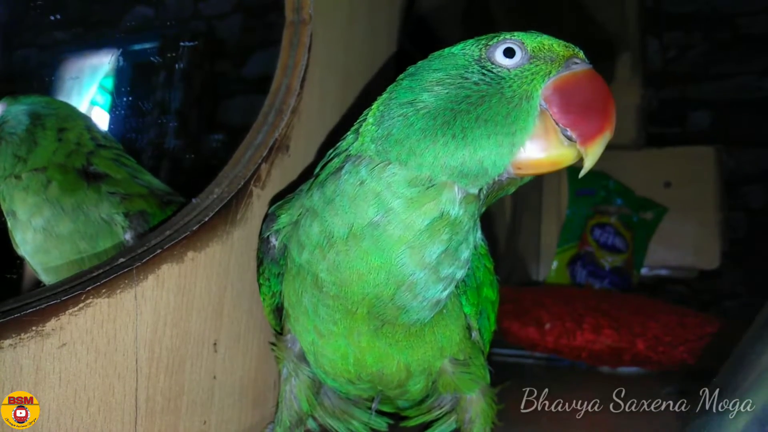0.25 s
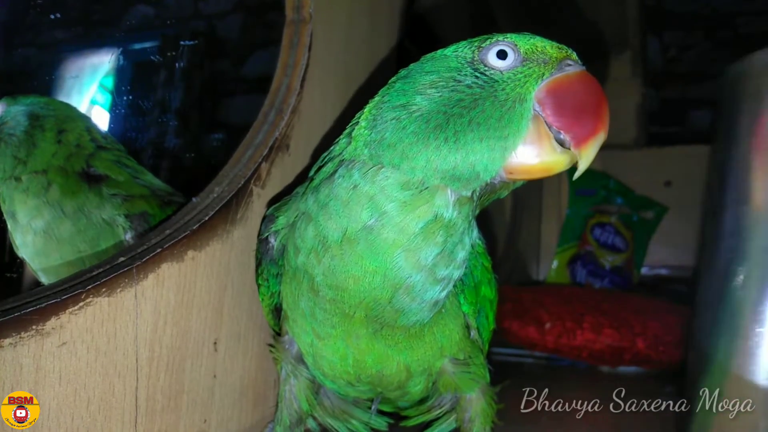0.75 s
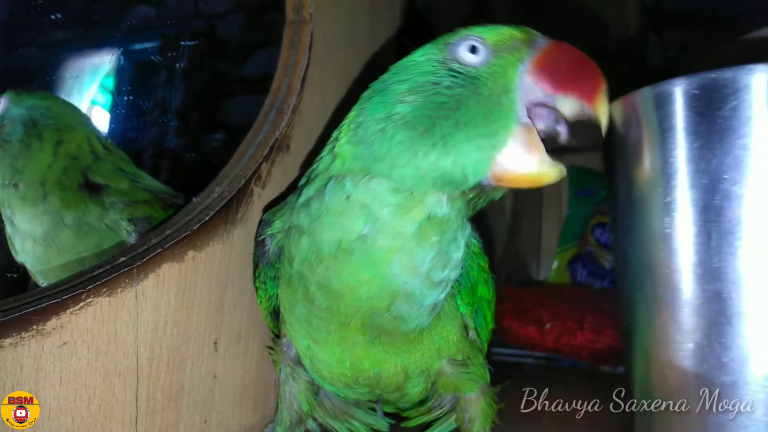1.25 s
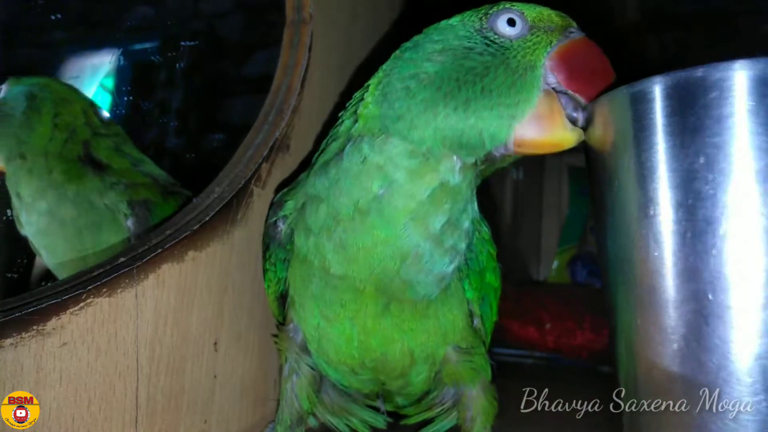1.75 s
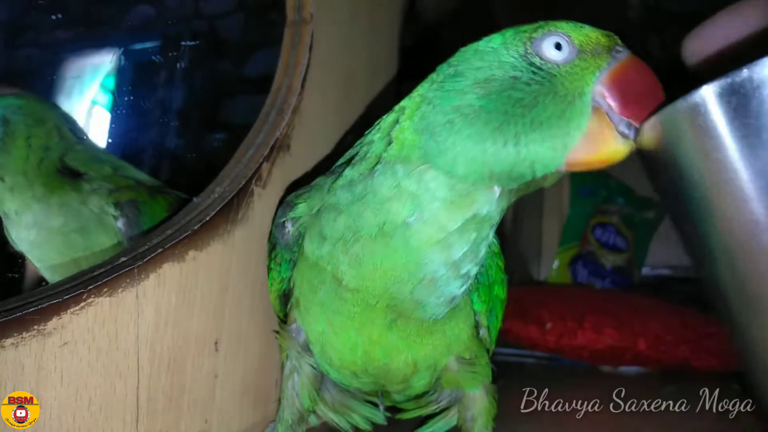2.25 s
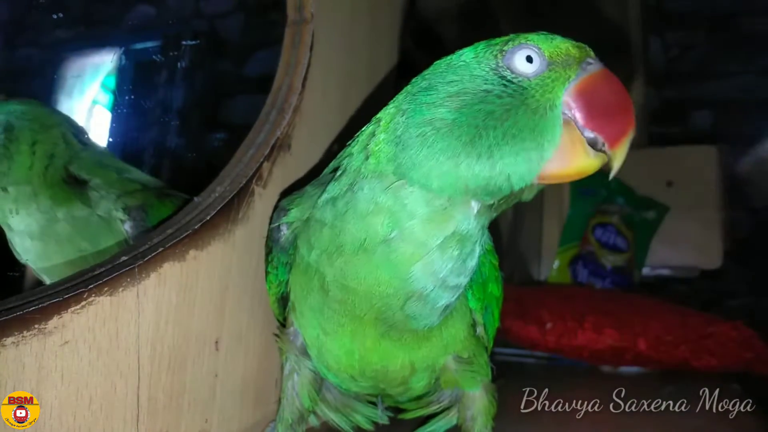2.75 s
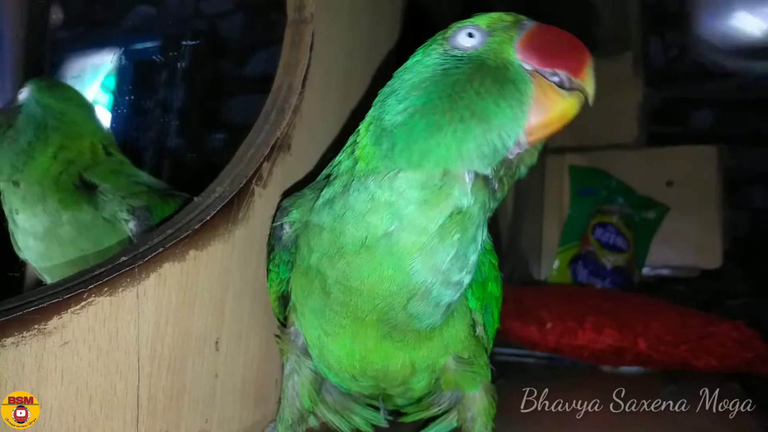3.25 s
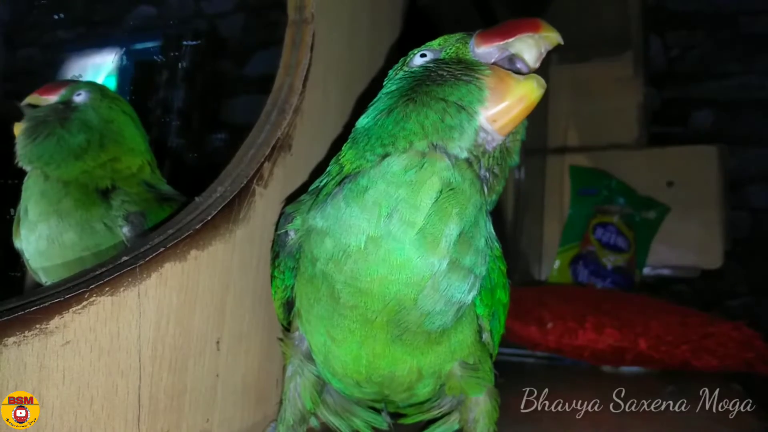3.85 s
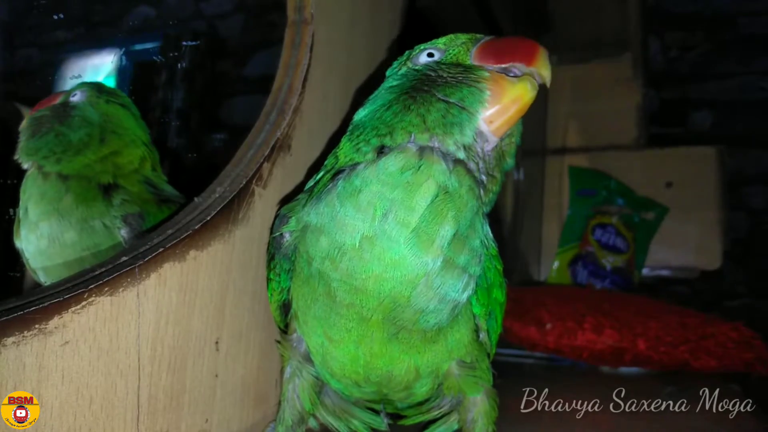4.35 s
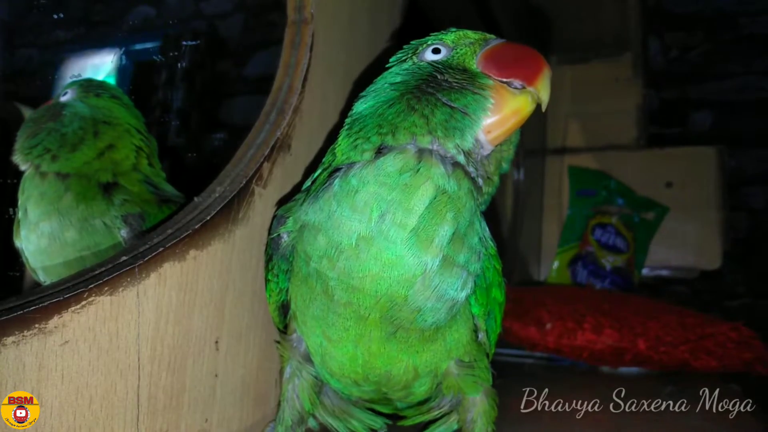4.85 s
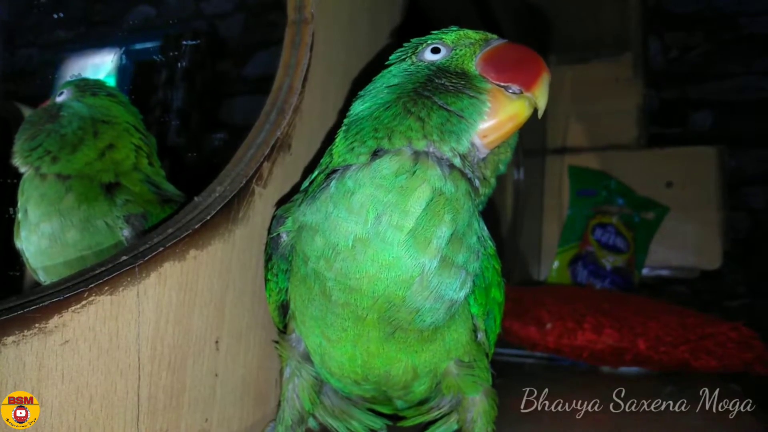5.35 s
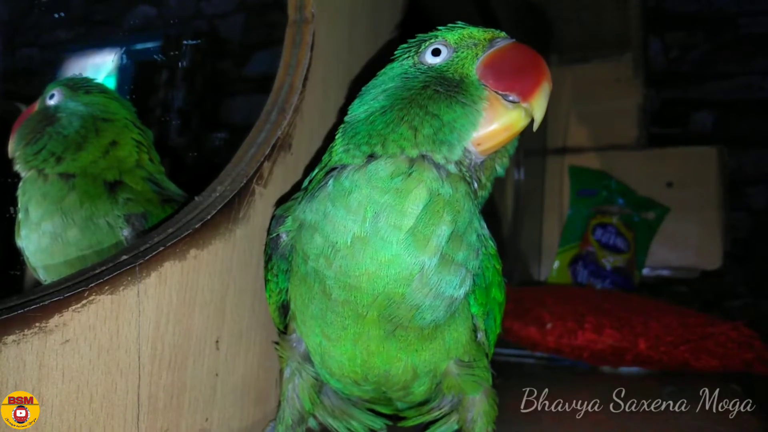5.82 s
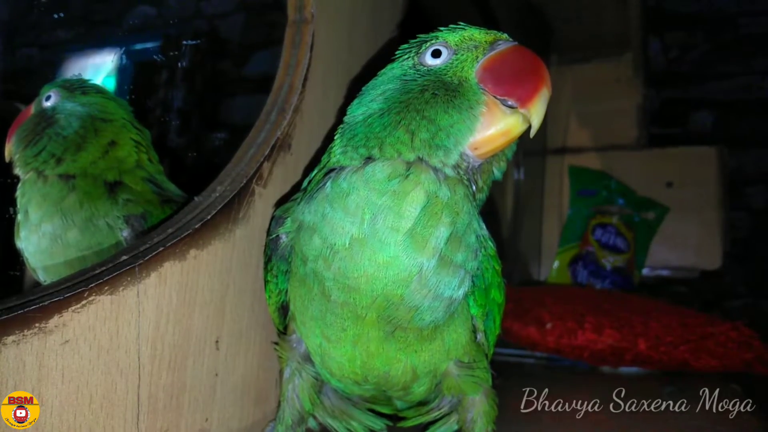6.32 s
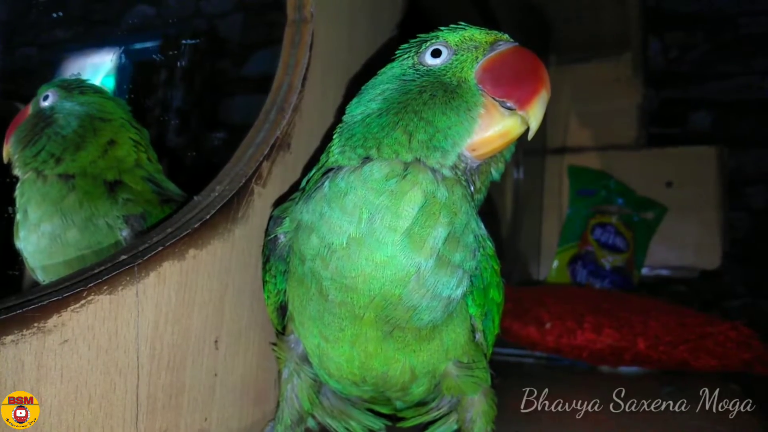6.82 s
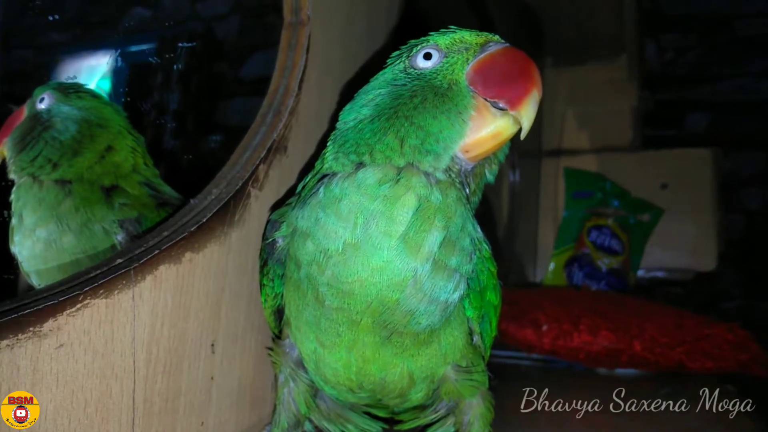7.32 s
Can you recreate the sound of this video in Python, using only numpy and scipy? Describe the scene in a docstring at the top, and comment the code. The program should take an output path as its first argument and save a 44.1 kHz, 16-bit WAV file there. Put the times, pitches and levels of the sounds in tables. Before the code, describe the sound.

Close recording of a parakeet in a small, hard-walled room. A fan rushes steadily and its draught thumps and rumbles unevenly against the microphone. The bird calls three times, once at about two seconds, then twice in quick succession after five, each shrill call starting abruptly, breaking into a harsh trill and leaving a short bright echo.

```python
"""Parakeet squawks in a small hard room

A parakeet close to the microphone squawks three times; the echo of an earlier squawk is dying at the start.
Pulses of its syrinx ring through the windpipe: a clear rising tone that cracks into a rough, trilling one.
Behind it a fan hisses as steady shaped noise, and its draught buffets the microphone with rumble and puffs.
Gain control eases the level down under the calls."""
import sys
import numpy as np
from scipy import signal
from scipy.fft import rfft, irfft, next_fast_len
from scipy.io import wavfile
from scipy.ndimage import uniform_filter1d, minimum_filter1d, map_coordinates

SR = 44100
rng = np.random.default_rng(int(sys.argv[2]) if len(sys.argv) > 2 else 0)


def waveform_to_disk(signal):
    """Save audio, clipped to [-1, 1], as 16-bit WAV at the path in sys.argv[1]."""
    frames = np.transpose(np.atleast_2d(signal))
    scaled = np.clip(frames, -1, 1) * 32767
    samples = np.round(scaled).astype(np.int16)
    wavfile.write(sys.argv[1], SR, samples)


N = 334278

# fan hiss, spectral shape: (frequency [Hz], relative density [dB per Hz])
FAN_SPECTRUM = [(90, -16), (150, -17.5), (198, -12), (240, -24.5), (290, -13.5), (325, -18.5), (370, -13.5),
                (650, -14.5), (805, -9), (945, -15), (1210, -12.5), (1450, -16.5), (2200, -20), (4600, -37),
                (8300, -50), (15500, -41)]
# draught strength: (time [s], rumble level [dB])
DRAUGHT_LEVEL = [(0.0, -53.5), (0.23, -52), (0.69, -57), (1.46, -57), (1.65, -48), (1.98, -52), (2.09, -56),
                 (2.83, -62.5), (3.08, -61), (3.21, -52), (3.46, -52), (3.76, -58), (4.08, -59),
                 (4.43, -48.5), (4.9, -50), (5.62, -62.5), (5.91, -54.5), (6.36, -61), (7.03, -49),
                 (7.16, -56), (7.35, -60), (7.58, -54)]
# buffeting, spectral shape: (frequency [Hz], relative density [dB per Hz])
RUMBLE_SPECTRUM = [(12, -25), (20, 1.5), (45, -1), (93, -6.5), (151, -20), (200, -16), (260, -44),
                   (440, -120)]
# strong puffs on the microphone: (time [s], nominal peak [dB], width [s], direction [1 push, -1 pull])
STRONG_PUFFS = [(0.649, -36, 0.0076, 1), (1.047, -36.5, 0.0072, 1), (1.529, -30.5, 0.0033, 1),
                (1.623, -33, 0.0056, 1), (1.816, -35, 0.0023, -1), (3.203, -33.5, 0.0049, -1),
                (4.329, -36, 0.006, 1), (4.656, -38.5, 0.004, 1), (4.997, -34, 0.0055, 1),
                (5.118, -34, 0.0052, 1), (5.405, -34, 0.0048, 1), (6.49, -36, 0.004, 1),
                (6.862, -34, 0.0049, -1), (6.89, -34, 0.0073, -1), (6.915, -35, 0.0029, 1),
                (7.134, -34.5, 0.0032, -1)]
# decay of the room's tail: (frequency [Hz], time to fall 60 dB [s])
ROOM_DECAY = [(500, 0.17), (1500, 0.63), (3500, 0.51), (7000, 0.41), (14000, 0.04)]
# first echoes off the walls: (delay [s], level against the direct sound [dB])
WALL_ECHOES = [(.007, -11), (0.015, -9.5), (.024, -14), (.05, -12), (.093, -20)]
# gesture of each squawk: (beak opens [s], voice cracks [s], beak opening while clear [0-1],
# beak opening while rasping [0-1], roughness added at the crack [0-1], its fading [s], trill strongest [s],
# trill length [s], trill rate [Hz], pitch swing [share of pitch], level swing [dB])
GESTURES = [(-.285, -.21, 1, .65, .55, .3, -.2, .05, 28, .07, 0),
            (2.133, 2.218, .8, .55, .5, .13, 2.257, .04, 30, .16, 2),
            (5.121, 5.2, .75, .75, .35, .05, 5.286, .08, 27, .1, 1),
            (6.05, 6.092, .25, .38, .42, .22, 6.175, .06, 30, .03, 4)]
# voice of each squawk, one list per call: (time [s], pitch before trill and jitter [Hz], relative level [dB])
VOICE_CURVES = [
    [(-.3, 908, -60), (-.28, 934, -22), (-.2, 1400, -28), (-.09, 1394, -32), (-.04, 1400, -55)],
    [(2.112, 770, -58), (2.118, 790, -29), (2.123, 805, -35), (2.128, 840, -15), (2.137, 930, -23),
     (2.18, 951, -14.5), (2.216, 990, -19), (2.221, 1290, -21), (2.236, 1186, -17.5), (2.25, 1448, -21.5),
     (2.3, 1471, -23), (2.4, 1423, -32), (2.47, 1439, -42), (2.5, 1411, -62)],
    [(5.093, 781, -43), (5.103, 777, -17), (5.109, 785, -32), (5.116, 828, -15.5), (5.124, 915, -23),
     (5.14, 960, -16), (5.176, 1005, -17), (5.19, 1095, -16), (5.205, 1100, -19), (5.222, 1265, -13.5),
     (5.25, 1602, -20.5), (5.365, 1539, -24), (5.398, 1218, -23.5), (5.412, 1150, -60)],
    [(6.027, 556, -60), (6.032, 585, -31), (6.04, 620, -23), (6.061, 735, -27), (6.067, 764.5, -9),
     (6.088, 829, -19.5), (6.093, 834.5, -28), (6.099, 813, -19.5), (6.125, 748.4, -15.5),
     (6.145, 850, -19), (6.17, 815, -20), (6.215, 1075, -21.5), (6.26, 1020, -26), (6.295, 1010, -28),
     (6.35, 935, -29), (6.395, 800, -32), (6.405, 780, -60)],
]
# windpipe behind a wide-open beak: (frequency [Hz], gain [dB])
OPEN_THROAT = [(400, -37), (930, -12.5), (1250, -17), (1550, -9.5), (1950, -4.5), (2900, -1.5),
               (3800, -9.5), (4750, -28), (5500, -13), (6700, -14.5), (8600, -42.5), (9700, -28.5),
               (11900, -37.5), (12900, -33), (13700, -28)]
# windpipe behind a nearly shut beak: (frequency [Hz], gain [dB])
SHUT_THROAT = [(400, -29), (800, -15), (1600, -17), (2100, -4.5), (2450, 4.5), (2800, -10), (3300, -23.5),
               (4300, -13), (5200, -11.5), (6500, -27.5), (8600, -51.5), (14000, -38.5)]
# colour of the microphone capsule: (frequency [Hz], gain [dB])
CAPSULE = [(20, 2.5), (5000, 1), (6450, 8.5), (7400, 5.5), (13200, -5), (14500, -1), (15450, 0.5)]

FAN_DB = -48
# weaker puffs: lowest nominal peak [dB], random rise above it [dB], middle width [s], share that push
LIGHT_PUFF_DB, LIGHT_SPREAD_DB, LIGHT_WIDTH_S, PUSH_SHARE = -43, 4, .0055, .7
LEAD_S = .4  # sound made before the start, so the earlier squawk can echo into it
# opening at both ends of a call; how fast the beak moves; closing before the end
NARROW_BEAK, BEAK_MOVE_S, CLOSE_S = 0.32, 0.002, 0.033
# a hoarse start clears; the crack is sudden
START_ROUGH, START_FADE_S, CLEAR_ROUGH, CRACK_S = .3, .02, .08, .002
TOP_HZ = 15520  # band limit


def amp(db):
    """Turn dB into gain."""
    return 10 ** (np.asarray(db) / 20)


def unit(x):
    """Bring x to rms 1."""
    return x / np.sqrt(np.mean(x ** 2) + 1e-20)


def along(points, hz):
    """Read (frequency [Hz], value) points on a log frequency axis."""
    f, v = np.transpose(points)
    return np.interp(np.log(hz + 1), np.log(f + 1), v)


def wobble(size, rate):
    """Draw a smooth random curve with `rate` knots a second."""
    knots = rng.standard_normal(int(size * rate / SR) + 4)
    return map_coordinates(knots, [np.arange(size) * rate / SR])


def coloured(x, points):
    """Pass x through the causal, minimum-phase filter with (frequency [Hz], gain [dB]) points."""
    m = 2 * next_fast_len(len(x) // 2 + 4096)
    gain = amp(along(points, np.fft.rfftfreq(m, 1 / SR)))
    cepstrum = irfft(np.log(gain), m)
    # folding the cepstrum forward in time makes the filter causal
    cepstrum[1:m // 2] *= 2
    cepstrum[m // 2 + 1:] = 0
    response = np.exp(rfft(cepstrum))
    return irfft(rfft(x, m) * response, m)[:len(x)]


def fan():
    """A steady, slightly patchy rush of air: noise with small level patches in time and frequency."""
    z = signal.stft(rng.standard_normal(N + 512), nperseg=512)[2]
    patches = uniform_filter1d(rng.standard_normal(z.shape), size=5, axis=0)
    patches = uniform_filter1d(patches, size=12, axis=1)
    air = signal.istft(z * amp(1.0 * unit(patches)), nperseg=512)[1][:N]
    level = amp(FAN_DB + 0.057 * wobble(N, 2.34))
    return level * unit(coloured(air, FAN_SPECTRUM))


def light_puffs(strength, count):
    """Random rows like STRONG_PUFFS, likelier to fall where the draught is strong."""
    when, size, width, way = rng.random((count, 4)).T
    share = np.cumsum(strength) / np.sum(strength)
    times = np.interp(when, share, np.arange(N) / SR)
    peaks_db = LIGHT_PUFF_DB + LIGHT_SPREAD_DB * size
    return np.transpose([times, peaks_db, LIGHT_WIDTH_S * (.5 + width), PUSH_SHARE - way])


def draught():
    """Eddies push the membrane: a lumpy rumble and single puffs with an opposite dip on either side."""
    s, db = np.transpose(DRAUGHT_LEVEL)
    lumps = amp(1.9 * wobble(N, 22)) * coloured(rng.standard_normal(N), RUMBLE_SPECTRUM)
    t = np.arange(N) / SR
    strength = amp(np.interp(t, s, db))
    out = strength * unit(lumps)
    for peak, peak_db, width, way in [*STRONG_PUFFS, *light_puffs(strength, count=22)]:
        centre = round(peak * SR)
        near = slice(max(centre - 1500, 0), centre + 1500)
        u = (t[near] - peak) / max(width, .001)
        shape = 1.47 * np.exp(-2.2 * u * u) - 0.56 * np.exp(-.25 * u * u)
        out[near] += np.sign(way) * amp(peak_db) * shape
    return out


def room(x):
    """A few walls answer first, then a tail in which each frequency dies at its own speed."""
    hz, t, z = signal.stft(rng.standard_normal(SR), SR, nperseg=256)
    decay = amp(-60 * t / along(ROOM_DECAY, hz)[:, None])
    tail = signal.istft(z * decay, SR, nperseg=256)[1]
    tail *= np.clip(np.arange(len(tail)) / (0.032 * SR), 0, 1)  # builds up over 32 ms
    tail *= amp(-9) / np.linalg.norm(tail)
    tail[0] = 1  # direct sound
    for s, db in WALL_ECHOES:
        tail[round(s * SR)] += amp(db)
    return signal.fftconvolve(x, tail)


def gesture(t, row):
    """Roughness, beak opening and trill of one squawk, drawn from its few moments."""
    opens, cracks, clear_beak, rasp_beak, rasp, fade, top, length, trill_hz, swing, swing_db = row

    def step(s, width):
        """A smooth move from 0 to 1 around time s."""
        return .5 + .5 * np.tanh((t - s) / width)

    cracked = step(cracks, CRACK_S)
    rough = CLEAR_ROUGH + START_ROUGH * np.exp((t[0] - t) / START_FADE_S)
    rough += cracked * rasp * np.exp(-((t - cracks) / fade) ** 2)
    beak = NARROW_BEAK + (clear_beak - NARROW_BEAK) * step(opens, BEAK_MOVE_S)
    beak += (rasp_beak - clear_beak) * step(cracks, BEAK_MOVE_S)
    beak += (NARROW_BEAK - rasp_beak) * step(t[-1] - CLOSE_S, CLOSE_S / 2)
    trill_size = cracked * np.exp(-((t - top) / length) ** 2 / 2)
    trill = trill_size * np.cos(2 * np.pi * trill_hz * (t - top))
    return np.clip(rough, 0, .95), np.clip(beak, 0, 1), swing * trill, swing_db * trill


def squawk(rows, row):
    """The syrinx pulses at the pitch; roughness makes cycles uneven and lets breath through once a cycle."""
    s, *curves = np.transpose(rows)
    t = np.arange(s[0], s[-1], 1 / SR)
    pitch, db = [np.interp(t, s, curve) for curve in curves]
    rough, beak, trill, trill_db = gesture(t, row)
    db = db + trill_db
    jitter = rough * (.1 * wobble(len(t), 130) + .08 * wobble(len(t), 700))
    pitch = pitch * (1 + trill + jitter)
    phase = 2 * np.pi * np.cumsum(pitch) / SR
    k = np.arange(1, 28)[:, None]  # harmonic numbers
    harmonic_hz = k * pitch
    # less effort, softer pulses: overtones above 3.3 kHz fade as the level drops
    effort_db = uniform_filter1d(db, size=900)
    slack_db = np.clip(-19.0 - effort_db, 0, 25)
    soft = amp(-.45 * slack_db * np.clip((harmonic_hz - 3300) / 900, 0, 2.5))
    below_top = np.clip((16000 - harmonic_hz) / 500, 0, 1)
    pulses = np.sum(soft * np.cos(k * phase) * below_top, axis=0)
    pulses *= np.sqrt(pitch / SR * 4)  # evens out the power as pitch moves
    pulses *= amp(rough * 7 * wobble(len(t), 200))
    breath = rng.standard_normal(len(t)) * (1 + np.cos(phase)) * 0.77
    source = amp(db + 12.5) * (np.sqrt(1 - rough ** 2) * pulses + rough * breath)
    # a narrow beak leaves one sharp windpipe resonance; an open one lets the overtones out
    return coloured(beak * source, OPEN_THROAT) + coloured((1 - beak) * source, SHUT_THROAT)


def parakeet():
    """Each squawk sounds at its moment and rings in the room with its own echo."""
    out = np.zeros(N + 3 * SR)
    for rows, row in zip(VOICE_CURVES, GESTURES):
        call = room(squawk(rows, row))
        start = round((rows[0][0] + LEAD_S) * SR)
        out[start:][:len(call)] += call
    return out[round(LEAD_S * SR):][:N]


def scene():
    """Fan, draught and bird add up at one microphone."""
    return (fan() + draught() + parakeet())[None]


def record(dry):
    """The capsule colours the sound; slow gain control eases loud sound down; a limiter and band limit follow."""
    power = np.abs(uniform_filter1d(dry[0] ** 2, size=400))
    fade = np.exp(-1 / (.25 * SR))  # gain control follows the power over 0.25 s
    held = signal.lfilter([1 - fade], [1, -fade], power)
    x = coloured(dry[0], CAPSULE) * (1 + held / amp(-32.5) ** 2) ** -.06
    # the limiter dips ahead of each peak and smooths its own gain
    needed = np.minimum(1, .48 / (np.abs(x) + 1e-9))
    x = x * uniform_filter1d(minimum_filter1d(needed, size=401), size=201)
    in_band = np.fft.rfftfreq(N, 1 / SR) < TOP_HZ
    return irfft(rfft(x) * in_band, N)[None]


dry = scene()
out = record(dry)
waveform_to_disk(out)
```